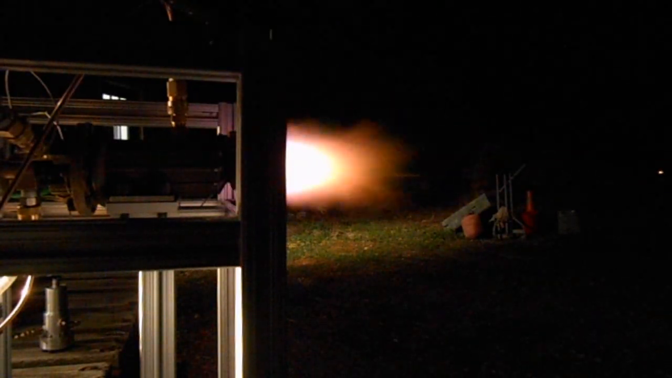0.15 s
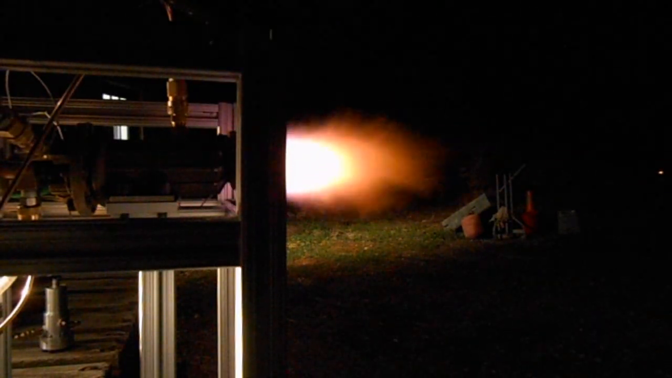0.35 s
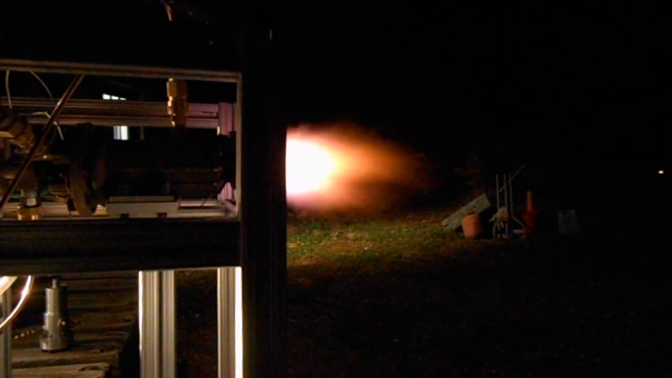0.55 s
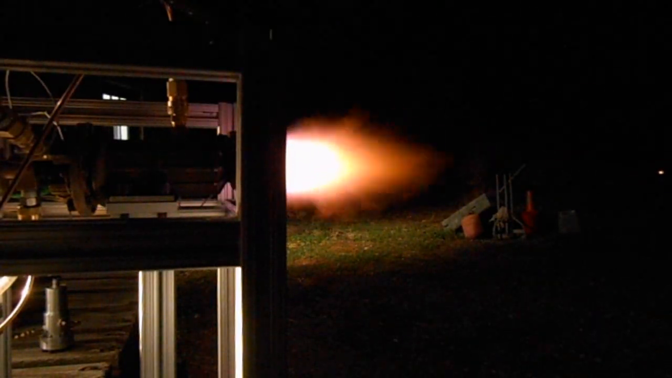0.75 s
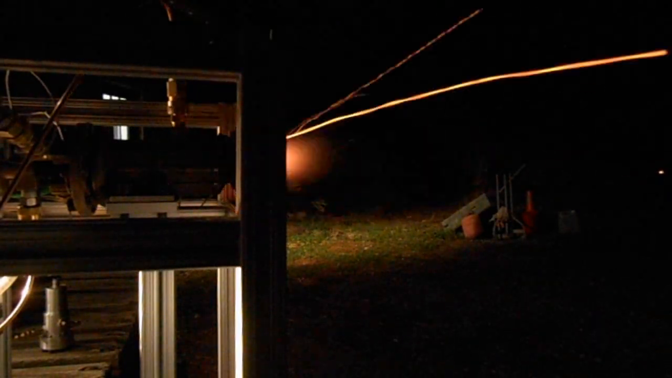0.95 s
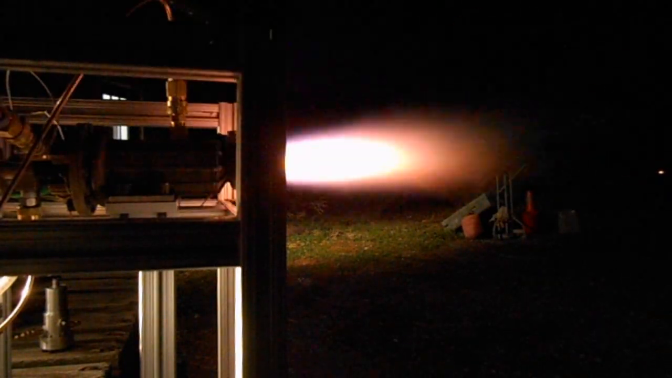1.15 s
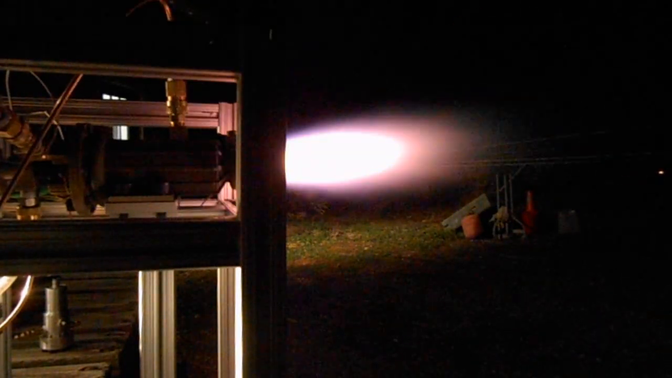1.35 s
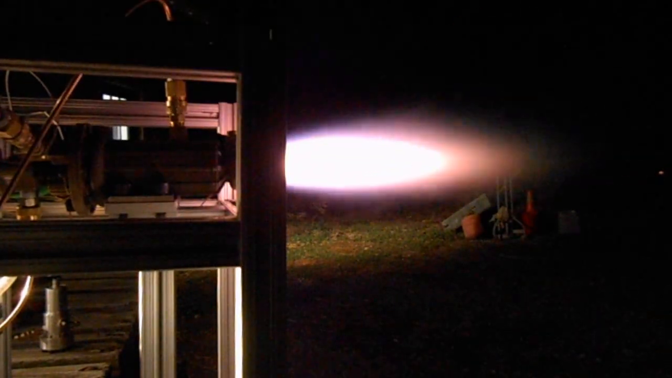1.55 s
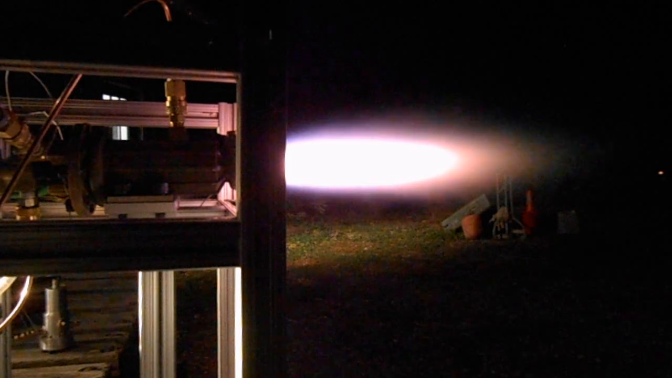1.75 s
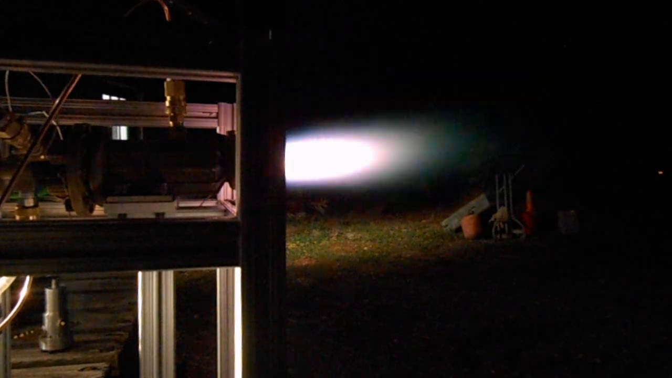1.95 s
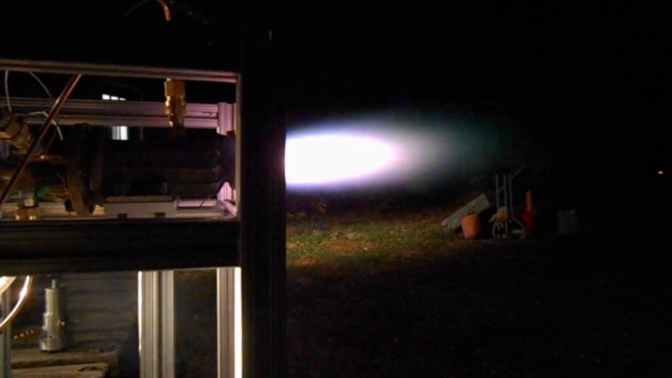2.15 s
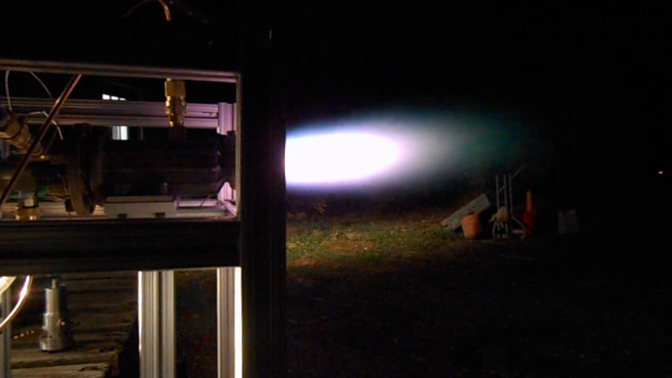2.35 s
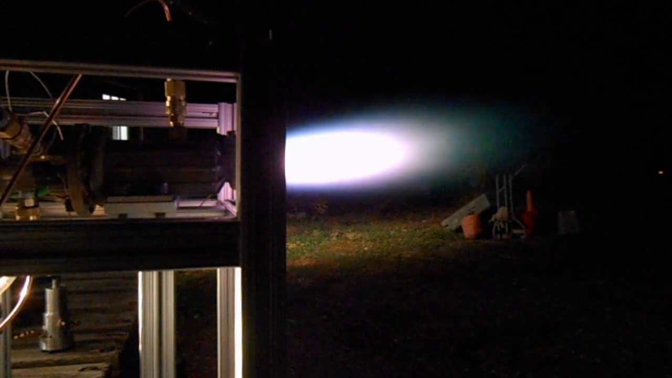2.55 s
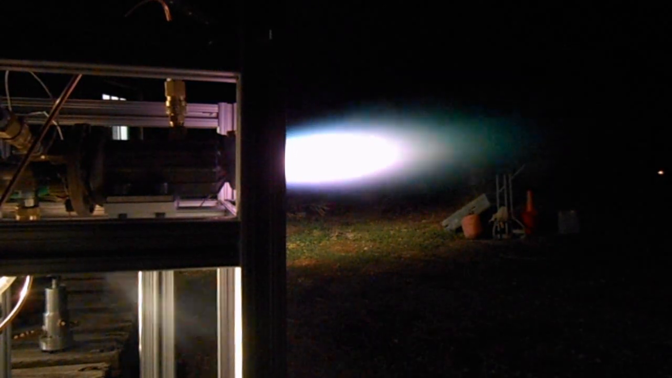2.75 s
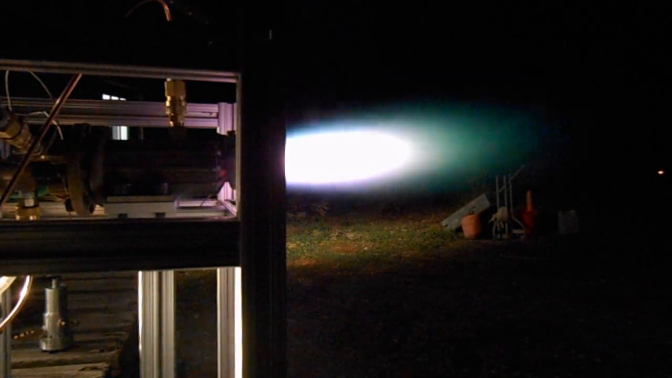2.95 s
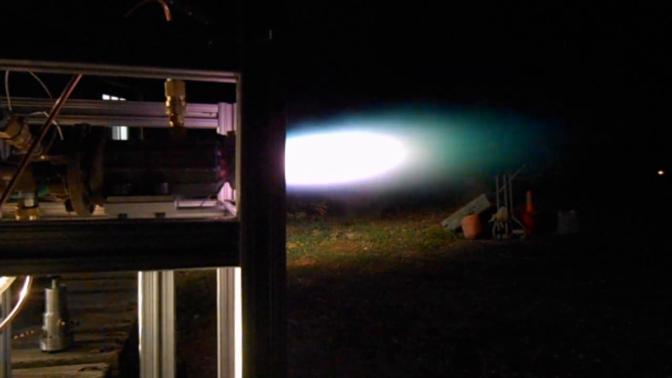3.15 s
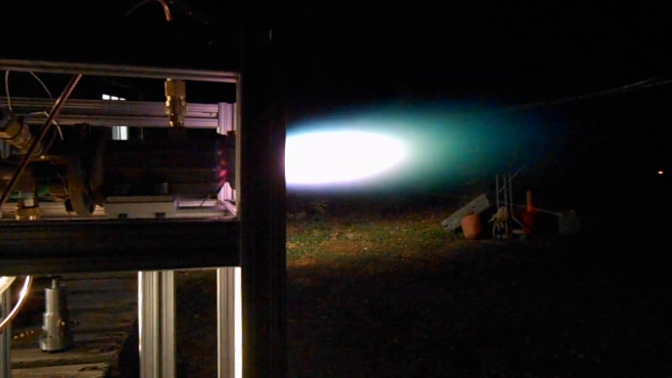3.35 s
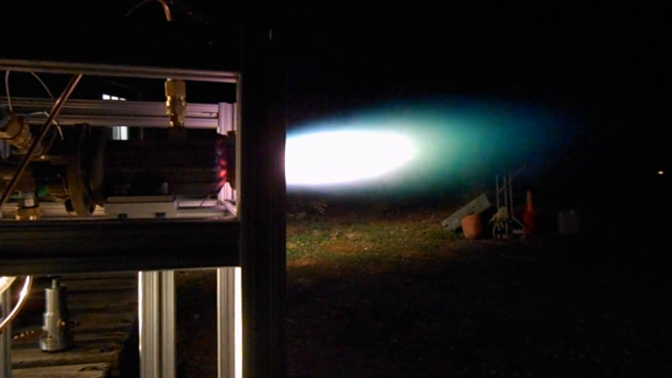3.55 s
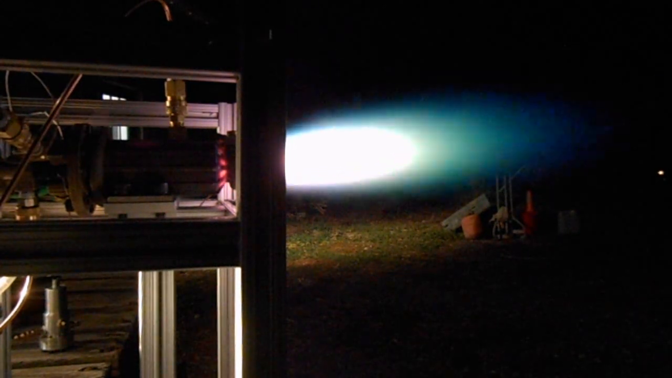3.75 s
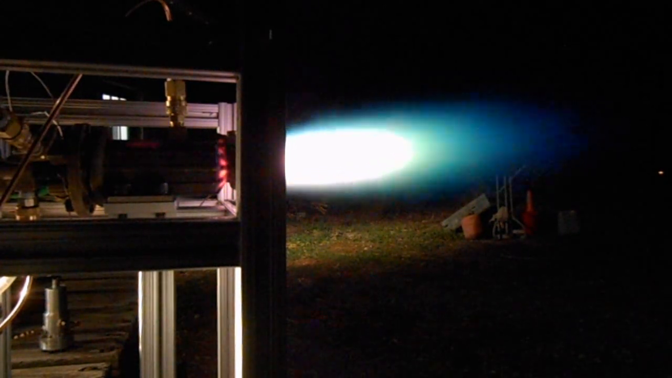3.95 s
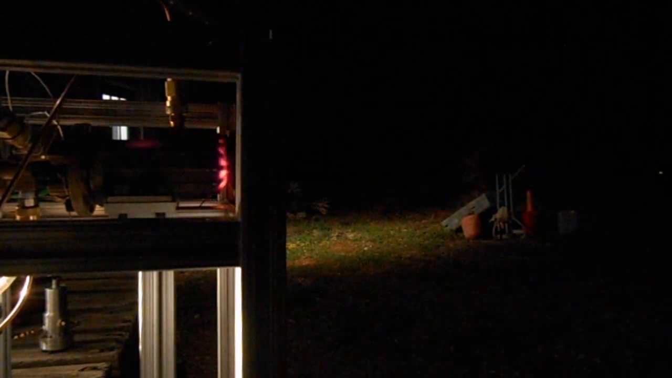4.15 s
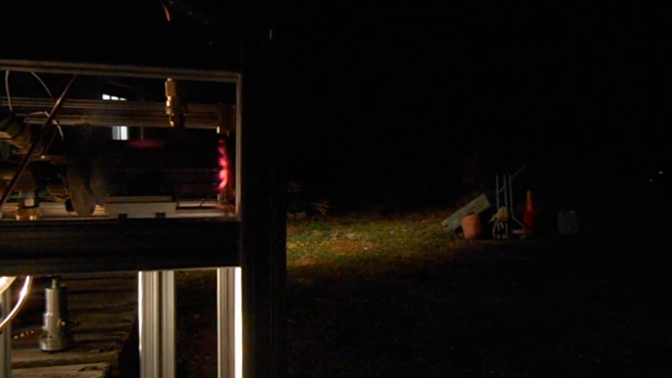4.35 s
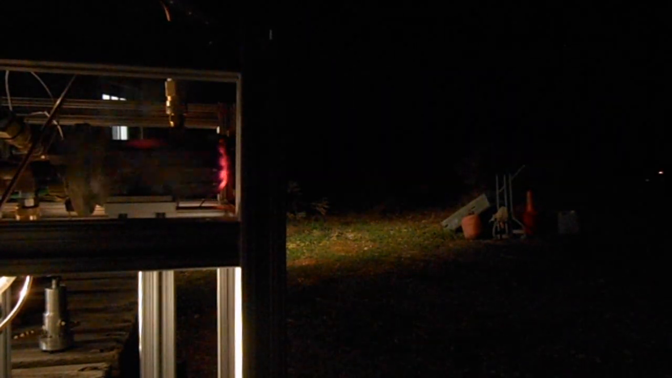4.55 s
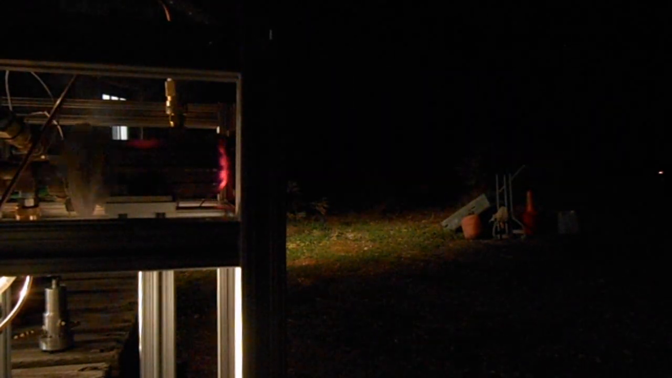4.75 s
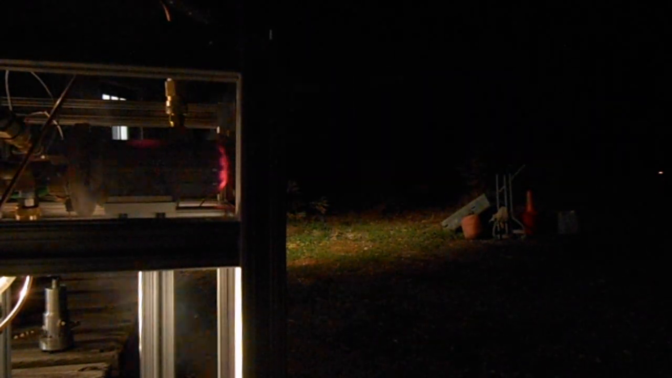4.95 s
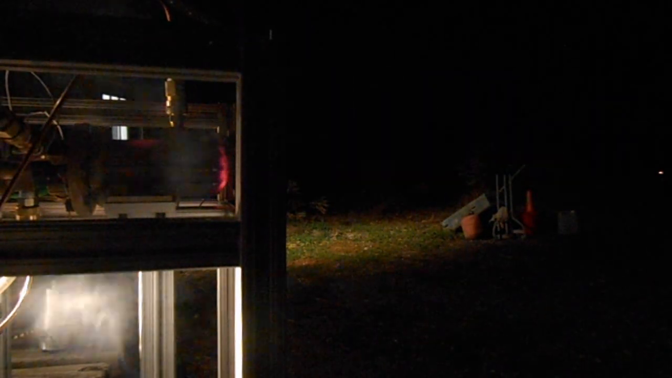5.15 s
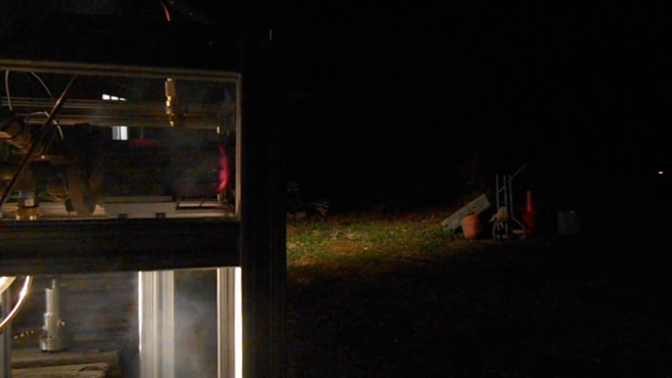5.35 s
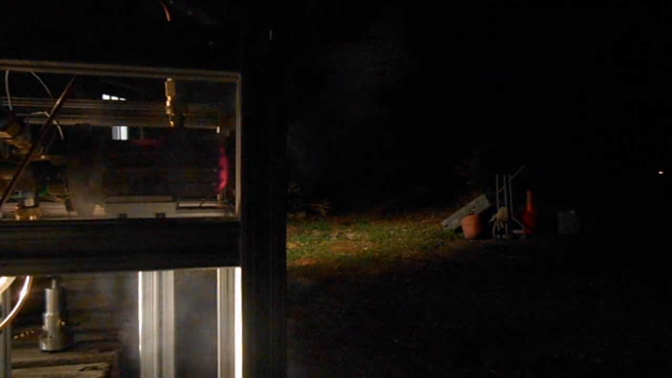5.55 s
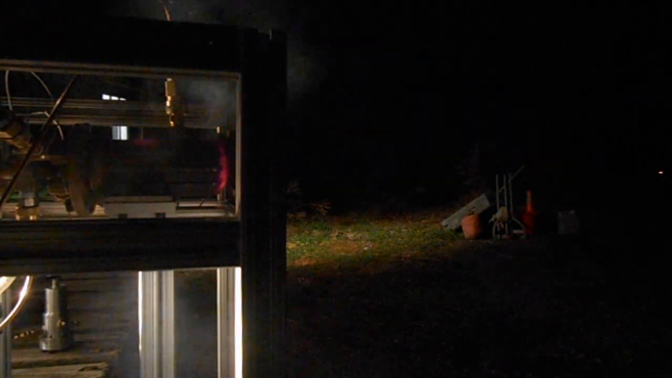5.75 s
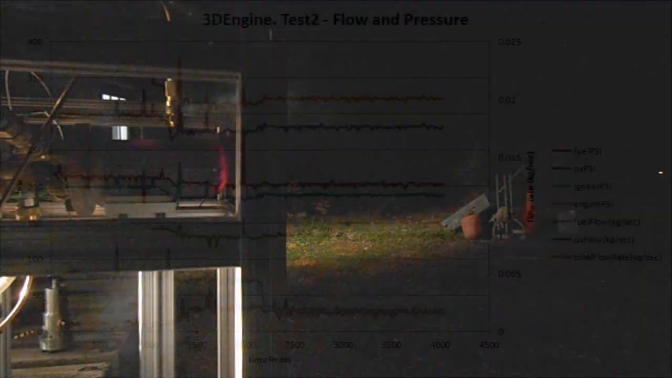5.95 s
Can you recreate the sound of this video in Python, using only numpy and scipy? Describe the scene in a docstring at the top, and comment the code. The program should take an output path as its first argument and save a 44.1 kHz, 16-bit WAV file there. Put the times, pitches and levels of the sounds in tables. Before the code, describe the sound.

A small rocket engine lights right at the start with a short, harsh bang that overloads the close microphone. A ragged, fluttering flame roars on until about 1 second, dips for an instant and catches again with a rasp. By 1.2 seconds it has opened into a loud, steady jet, a bright rushing hiss with rumble underneath. At 4.1 seconds the valves shut and the level drops sharply with a low thump. Fainter gas blows through the chamber, a raspy rush turning into a hollow, breathy note that sinks in pitch and dies away at about 5 seconds. Then the spark igniter's thin, rapidly stuttering electric buzz swells over a soft hiss and carries on to the end, near 6 seconds, much quieter than the jet. Outdoor wind rumbles on the microphone, with thumping gusts around 5.2 and 5.9 seconds.

```python
"""Small rocket engine on a test stand

Outdoors at night, close to a mono microphone that it overloads, the engine lights with a blast,
burns with a ragged low flame, then opens up to a hissing jet. After shutdown, gas blows through
the cooling chamber with a sinking hollow note. Then the spark igniter's stuttering buzz swells,
and gusts of wind hit the microphone."""
import sys
import numpy as np
from scipy import signal
from scipy.fft import rfft, irfft
from scipy.io import wavfile
from scipy.ndimage import uniform_filter1d

SR = 44100
rng = np.random.default_rng(int(sys.argv[2]) if len(sys.argv) > 2 else 0)


def inscribe(sig):
    """Save sig as 16-bit PCM at rate SR to the path in sys.argv[1].

    A 1-D sig is mono; a 2-D sig holds one channel per row.
    Samples are clipped to [-1, 1] before scaling.
    """
    pcm = np.round(np.clip(np.atleast_2d(sig).T, -1, 1) * 32767)
    wavfile.write(sys.argv[1], SR, pcm.astype(np.int16))


N = 264600
TIME = np.arange(N) / SR
FREQS = np.maximum(np.arange(N // 2 + 1) * SR / N, 1)
CUTOFF_HZ = 15750
# the flame catches again, the jet reaches full strength, the valves shut
RELIGHT_S, FULL_JET_S, SHUTDOWN_S = 1.017, 1.223, 4.105


def from_db(db):
    """Turn decibels into a number to multiply a sound by."""
    return 10 ** (np.asarray(db) / 20)


def rms_one(x):
    """Scale a sound to an average power of 1."""
    return x / np.sqrt(np.mean(x ** 2) + 1e-20)


def since(s):
    """Seconds gone by since s; zero before it."""
    return np.maximum(TIME - s, 0)


def until(s):
    """Seconds left until s; zero after it."""
    return np.maximum(s - TIME, 0)


def envelope(full_s, end_s, db, rise_db_per_s, fall_db_per_s):
    """A volume curve that rises, holds from full_s to end_s and falls."""
    level_db = db - rise_db_per_s * until(full_s) - fall_db_per_s * since(end_s)
    return from_db(np.maximum(level_db, -200))


def noise(top_hz, order=2):
    """Noise of power 1 that fades away above top_hz."""
    rolloff = np.sqrt(1 + (FREQS / top_hz) ** (2 * order))
    return rms_one(irfft(rfft(rng.standard_normal(N)) / rolloff, N))


def colour(x, tone):
    """Shape bass and treble with a curve through (frequency, level) points."""
    hz, db = np.transpose(tone)
    return irfft(rfft(x) * from_db(np.interp(np.log(FREQS), np.log(hz), db)), N)


def bumps(x, bands):
    """Turn narrow frequency bands up or down."""
    db = sum(height / (1 + (2 * (FREQS - hz) / width) ** 2) for hz, width, height in bands)
    return irfft(rfft(x) * from_db(db), N)


def resonate(x, hz, width_hz, block=256):
    """Make a sound ring around one pitch; pitch and width may glide."""
    hz = np.broadcast_to(hz, N)
    decay = np.broadcast_to(np.exp(-np.pi * width_hz / SR), N)
    out, state = np.zeros(N), np.zeros(2)
    for i in range(0, N, block):
        poles = [1, -2 * decay[i] * np.cos(2 * np.pi * hz[i] / SR), decay[i] ** 2]
        out[i:i + block], state = signal.lfilter([1, 0, -1], poles, x[i:i + block], zi=state)
    return out * (1 - decay * decay) / 2


def scatter(x, longest_s, feedback, count=5):
    """Close reflections smear a snap in time without changing its tone."""
    for lag in np.maximum(rng.uniform(longest_s / 8, longest_s, count) * SR, 1).astype(int):
        loop = np.r_[1, np.zeros(lag - 1), feedback * rng.choice([-1, 1])]
        x = signal.lfilter(loop[::-1], loop, x + 1e-18)
    return x


def wind(draught_db=-49.5, breeze_db=-39.5, breeze_from_s=5.0, rise_db_per_s=85, gust_s=0.046):
    """Air rumbles on the microphone; each buffet pushes and then pulls, inside a short gust."""
    # tone of the rumble: (frequency [Hz], level [dB])
    rumble_tone = [(15, 8), (45, 3), (100, -4), (170, -18), (300, -30), (1000, -63)]
    # single thumps of air: (time [s], level [dB], frequency [Hz])
    buffets = [(4.135, -21, 22), (4.995, -31, 80), (5.06, -31, 22), (5.203, -20, 55.2), (5.228, -23, 91),
               (5.362, -29, 60), (5.887, -25, 79.7), (5.925, -17.5, 85)]
    draught = from_db(draught_db) * (TIME > SHUTDOWN_S)
    breeze = from_db(breeze_db - rise_db_per_s * until(breeze_from_s))
    power = draught ** 2 + breeze ** 2
    pushes = np.zeros(N)
    for s, db, hz in buffets:
        phase = 2 * np.pi * hz * (TIME - s)
        pushes -= from_db(db) * 2 * phase / (1 + phase ** 2 / 2) ** 2
        gust = from_db(db - 12.5) * np.exp(-((TIME - s) / gust_s) ** 2)
        power += gust ** 2
    rumble = rms_one(colour(rng.standard_normal(N), rumble_tone))
    return pushes + np.sqrt(power) * rumble


def spark_times(start_s, spark_hz=498, period_s=.0399, length_s=0.03, jitter_s=.0016):
    """Sparks come in regular bursts, each starting and ending a little early or late."""
    beats = np.arange(start_s, N / SR, period_s)
    slips = jitter_s * rng.standard_normal(size=(64, 2))
    bursts = [np.arange(s + start_slip, s + length_s + end_slip, 1 / spark_hz)
              for s, (start_slip, end_slip) in zip(beats, slips)]
    return np.concatenate(bursts)


def igniter(start_s=4.962, swell_s=0.36, uneven_db=3.0, misfire_chance=.04):
    """Each spark is a snap, scattered by the metal stand, and a brief sizzle, over a soft hiss."""
    # tone of the sparks: (frequency [Hz], level [dB])
    spark_tone = [(300, -25), (520, -1), (1500, -24.5), (2200, -5.5), (2600, -31), (3200, -8), (4100, -11),
                  (4900, -0.5), (6950, 1), (8200, -4), (10400, -12.5), (12500, -15), (14500, -9),
                  (15700, -10)]
    # resonances and dips of the igniter's housing: (frequency [Hz], width [Hz], level [dB])
    housing_peaks = [(3030, 150, 12), (3400, 88, 15), (5000, 270, 3.5), (7270, 110, -11), (7520, 240, 5),
                     (9020, 250, 4), (13000, 250, 7), (14520, 250, 1)]
    # tone of the soft outdoor hiss: (frequency [Hz], level [dB])
    yard_tone = [(30, -6), (200, -2), (340, -6), (700, -0.5), (1400, -11), (2150, -4.5), (2600, -17),
                 (5000, -16), (10000, -17), (15000, -28.5)]
    at = np.clip(np.round(spark_times(start_s) * SR).astype(int), 0, N - 1)
    strength = from_db(uneven_db * rng.standard_normal(N)) * (rng.random(N) > misfire_chance)
    snaps = np.zeros(N)
    snaps[at] = strength[at]
    sparks = scatter(rms_one(snaps), longest_s=.00035, feedback=0.5)
    # every spark takes its own path, so no sizzle repeats; a faint echo fills the gaps between bursts
    sizzle, echo = (-2, 0.005), (-12, 0.047)  # (level against the snaps [dB], time to fade 60 dB [s])
    for db, fade_s in sizzle, echo:
        tail = signal.lfilter([1], [1, -from_db(-60 / (fade_s * SR))], snaps + 1e-18)
        sparks += from_db(db) * rms_one(tail * rng.standard_normal(N))
    buzz = bumps(colour(sparks, spark_tone), housing_peaks)
    buzz /= np.std(buzz[at[0]:])
    hiss = rms_one(colour(rng.standard_normal(N), yard_tone))
    swell = from_db(-20 - 49.5 * np.exp(-since(start_s) / swell_s))  # grows, then levels off
    return swell * (from_db(-2.5) * buzz + from_db(-11) * hiss)


def gas_flow(purge_end_s=4.95, fall_db_per_s=402):
    """How strongly gas blows through the chamber; the purge is the flush after shutdown."""
    # relight, shutdown rush, purge and its last push:
    # (full at [s], fading from [s], level [dB], rise [dB/s], fall [dB/s])
    blows = [(1.058, 1.17, -17.5, 130, 81), (4.14, 4.176, -21, 90, 52), (4.348, 4.906, -32, 60, 193),
             (4.72, 4.8, -31, 88, 48)]
    flow = np.sqrt(sum(envelope(*blow) ** 2 for blow in blows))
    return flow * from_db(-fall_db_per_s * since(purge_end_s))


def chamber(cool_hz=2790, hot_hz=4100, warm_up_s=0.03, cool_delay_s=.11, cool_down_s=.2):
    """Gas makes the chamber ring, higher as it heats and lower as it cools; hard flow adds a rasp."""
    # lengthwise resonances of the cool chamber: (distance above the first [Hz], width [Hz], level [dB])
    chamber_modes = [(0, 240, 2), (2800, 270, -10), (5480, 380, -8)]
    # steady resonances of the nozzle and pipes: (frequency [Hz], width [Hz], level [dB])
    nozzle_modes = [(240, 220, -12), (1700, 700, -14), (3900, 330, -12), (5050, 250, -17), (7700, 450, -15),
                    (8400, 500, -14), (9850, 700, -16), (12150, 600, -18), (13650, 500, -14)]
    # hollow note of the nozzle's throat during the purge: (time [s], pitch [Hz])
    throat_note = [(4.17, 634), (4.36, 895), (4.72, 800), (4.97, 650)]
    warmed = 1 - np.exp(-since(RELIGHT_S) / warm_up_s)
    cooled = 1 - np.exp(-since(SHUTDOWN_S + cool_delay_s) / cool_down_s)
    first_hz = cool_hz + (hot_hz - cool_hz) * warmed * (1 - cooled)
    first_hz *= 1 + .018 * noise(25)  # uneven gas temperature
    blur = 1 + 1.9 * (1 - cooled) ** 2  # hot, hard flow widens the resonances
    modes = [(first_hz + above, width * blur, db) for above, width, db in chamber_modes]
    # the rasp is gentler at the relight; as the chamber cools it gives way to the throat note
    rasp_db = np.where(TIME < SHUTDOWN_S, -7.5, 1 - 21 * cooled)
    rasp = (2400, 1800, rasp_db)  # one broad resonance
    throat_hz = np.interp(TIME, *np.transpose(throat_note))
    purge = rng.standard_normal(N) * (TIME > SHUTDOWN_S)
    ringing = from_db(1 + 5 * cooled) * resonate(purge, throat_hz, width_hz=180)
    for hz, width, db in [*modes, *nozzle_modes, rasp]:
        band = resonate(rng.standard_normal(N), hz, width)
        ringing += from_db(db) * resonate(band, hz, 3 * width)
    ringing /= np.sqrt(uniform_filter1d(ringing ** 2, size=8000))  # even out the loudness
    flutter = from_db(1.2 * noise(45))
    return gas_flow() * ringing * flutter


def exhaust(tone, drive, lean, surge, surge_hz, flutter_db):
    """Swirling gas hisses over slow pressure surges; the overloaded microphone squashes it unevenly."""
    hiss = noise(CUTOFF_HZ, order=8) * from_db(flutter_db * noise(60))
    pressure = hiss + surge * noise(surge_hz)
    # each surge pushes the microphone towards its limit and chokes the hiss for a moment
    squashed = np.tanh(drive * pressure + lean)
    return rms_one(colour(squashed - squashed.mean(), tone))


def blast(level_db=-8.5, hold_s=0.099, fall_db_per_s=225):
    """The fuel lights with a bang that holds briefly and dies fast."""
    # tone of the blast: (frequency [Hz], level [dB])
    blast_tone = [(30, -1.5), (250, -0.5), (700, -0.5), (950, 2), (1300, -4), (4400, -5.5), (5000, -2),
                  (5400, -5.5), (7200, -8.5), (9300, 0.5), (11700, -6.5), (12600, -3), (14500, -14.5),
                  (15700, -20)]
    roar = exhaust(blast_tone, drive=2.1, lean=.15, surge=0.14, surge_hz=200, flutter_db=4.0)
    return from_db(level_db - fall_db_per_s * since(hold_s)) * roar


def low_flame(rise_db_per_s=148, fall_db_per_s=218):
    """A ragged flame burns, goes out and catches again."""
    # tone of the flame: (frequency [Hz], level [dB])
    flame_tone = [(25, -1.5), (120, -3), (400, -1.5), (1400, -4), (1900, -2.5), (4000, -5.5), (5700, -5.5),
                  (6300, -9), (7300, -9), (8500, -3.5), (9800, -3), (12400, -8), (14000, -11.5),
                  (15700, -22)]
    # resonances and dips of the test stand: (frequency [Hz], width [Hz], level [dB])
    stand_peaks = [(3980, 320, 2.5), (4470, 200, -2), (5170, 250, 4), (5340, 220, -5), (5660, 240, 2),
                   (9700, 470, 5.5), (12300, 620, 6)]
    # first burn and relight: (full at [s], fading from [s], level [dB])
    burns = [(.13, 0.992, -14.5), (1.09, 1.2, -20)]
    roar = exhaust(flame_tone, drive=0.83, lean=0.56, surge=0.22, surge_hz=132, flutter_db=1.7)
    power = sum(envelope(*burn, rise_db_per_s, fall_db_per_s) ** 2 for burn in burns)
    return np.sqrt(power) * rms_one(bumps(roar, stand_peaks))


def jet(valve_drop_db=6.5, valve_travel_s=0.022):
    """The full jet builds up, drops sharply as the valves shut, then drains away."""
    # tone of the jet: (frequency [Hz], level [dB])
    jet_tone = [(25, -6), (200, -4.5), (2600, -4.5), (4000, -1), (5000, -1.5), (7000, -2.5), (8500, 0),
                (10000, 0.5), (12200, -3), (13500, -6), (15700, -13.5)]
    hiss = exhaust(jet_tone, drive=0.37, lean=0.066, surge=0.098, surge_hz=90, flutter_db=0.17)
    closed = np.minimum(since(SHUTDOWN_S) / valve_travel_s, 1)
    volume = envelope(FULL_JET_S, SHUTDOWN_S, db=-11, rise_db_per_s=107, fall_db_per_s=96)
    return from_db(-valve_drop_db * closed) * volume * hiss


def scene():
    """Everything reaches one microphone, so both channels are alike."""
    mono = blast() + low_flame() + jet() + chamber() + igniter() + wind()
    return np.array([mono, mono])


def record(dry):
    """The microphone's opening carves dips into the treble; peaks are clipped and the top is cut."""
    # dips made by the opening: (frequency [Hz], width [Hz], level [dB])
    port_dips = [(11010, 650, -12.5), (4680, 150, -1.5)]
    clipped = np.clip(bumps(dry, port_dips), -.9, .9)
    return irfft(rfft(clipped) / np.sqrt(1 + (FREQS / CUTOFF_HZ) ** 400), N)


dry = scene()
out = record(dry)
inscribe(out)
```